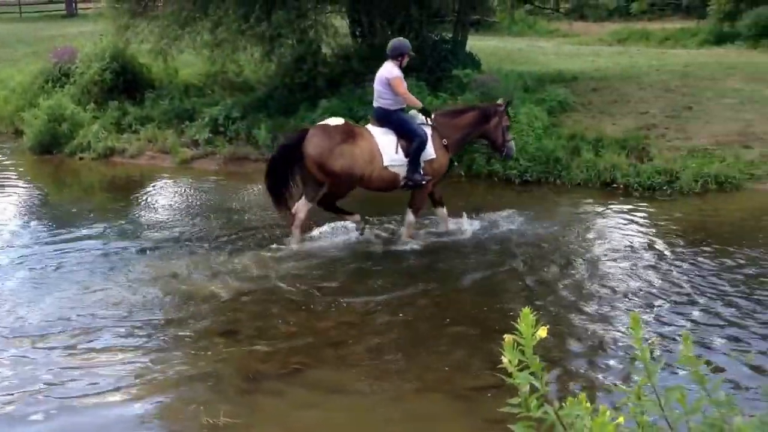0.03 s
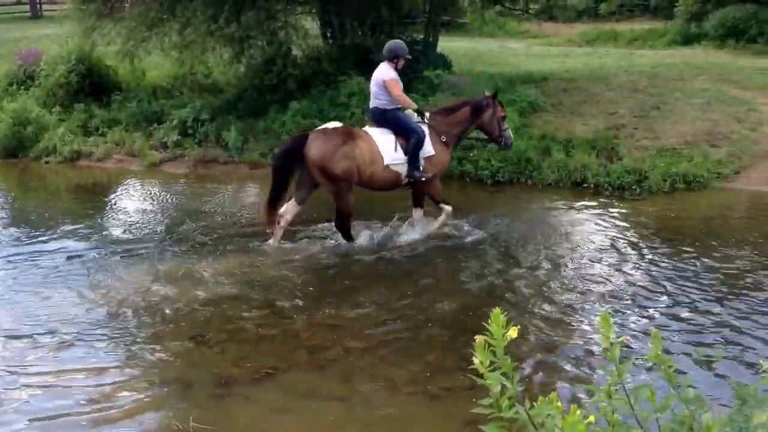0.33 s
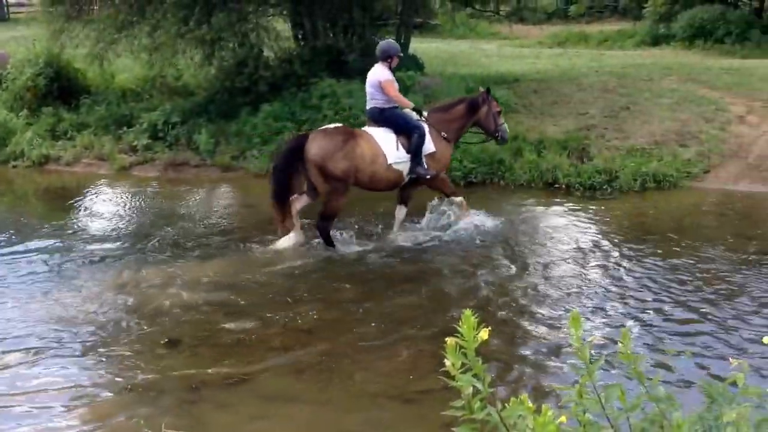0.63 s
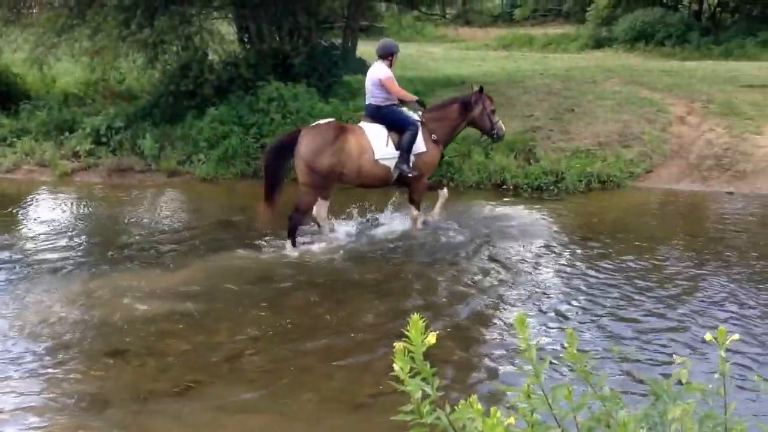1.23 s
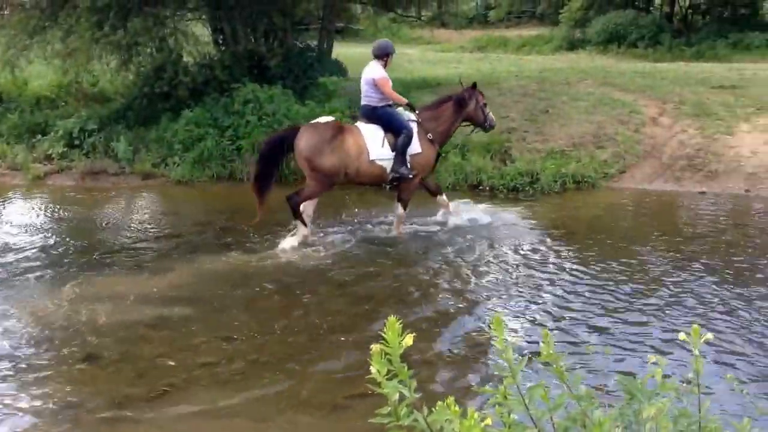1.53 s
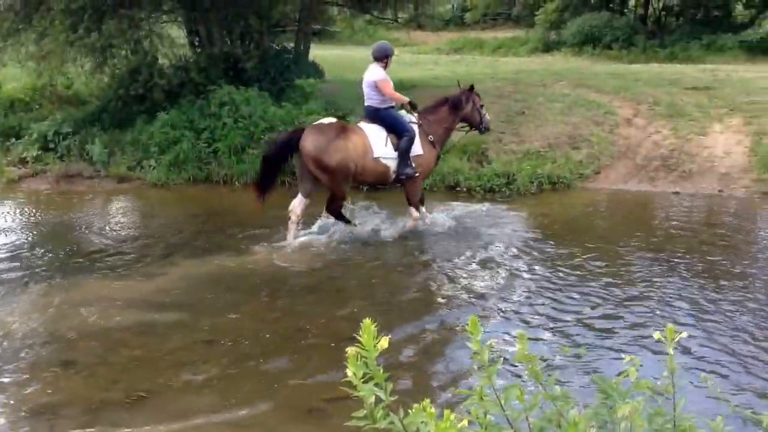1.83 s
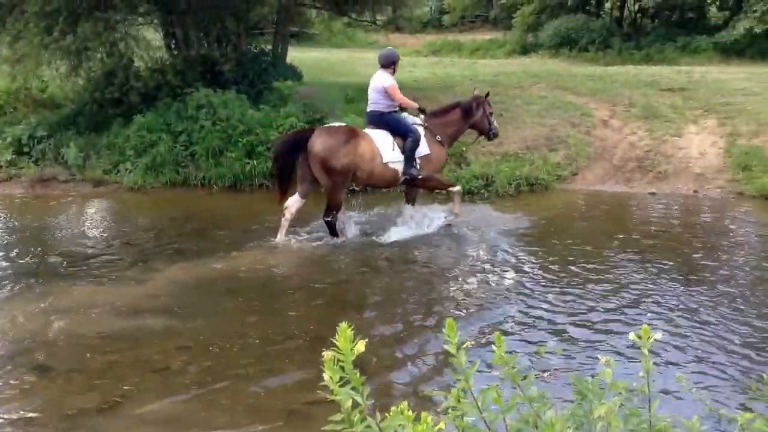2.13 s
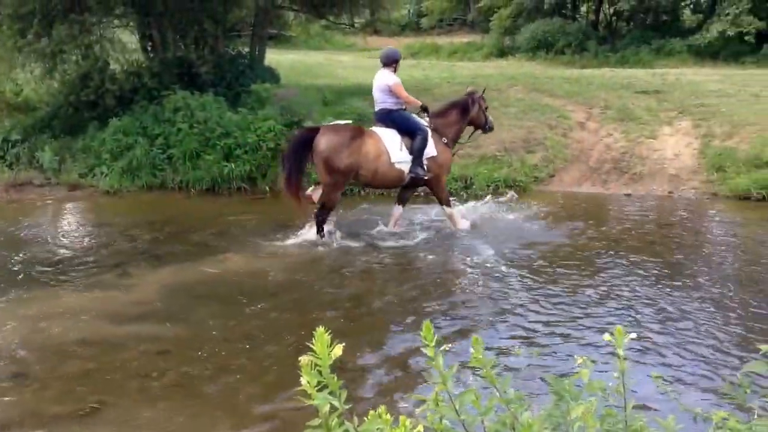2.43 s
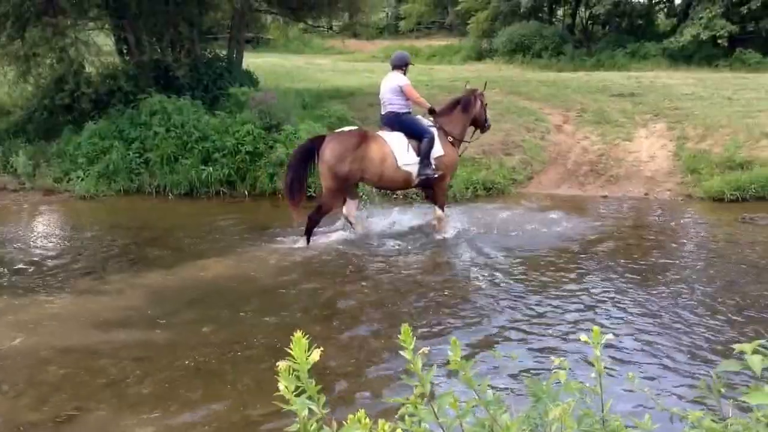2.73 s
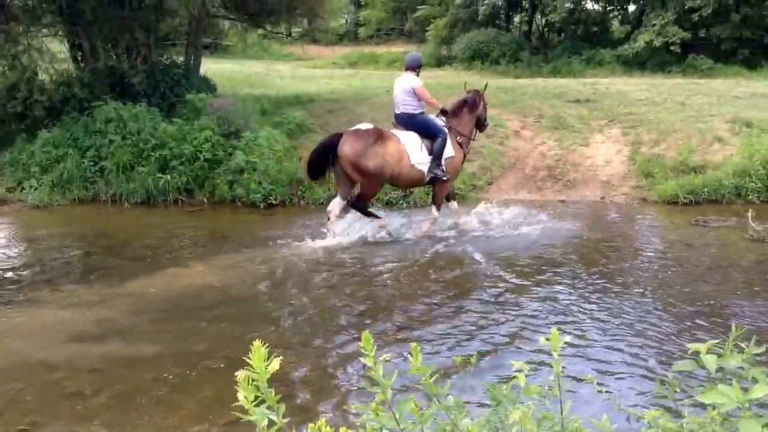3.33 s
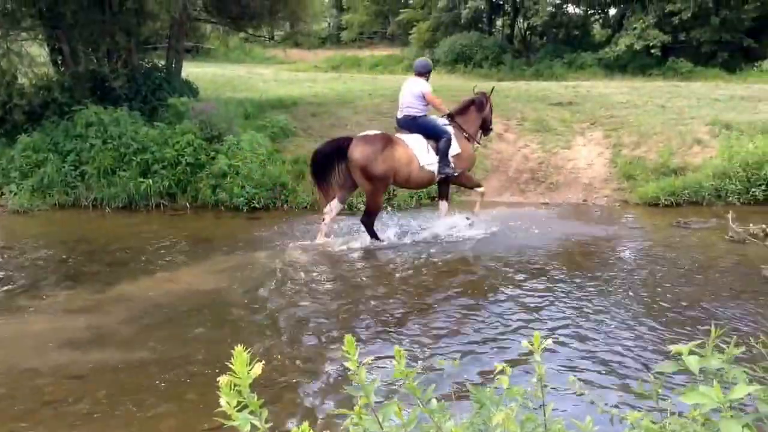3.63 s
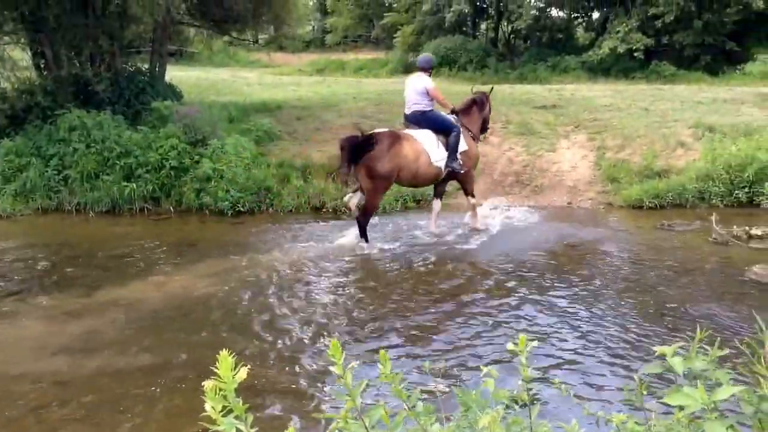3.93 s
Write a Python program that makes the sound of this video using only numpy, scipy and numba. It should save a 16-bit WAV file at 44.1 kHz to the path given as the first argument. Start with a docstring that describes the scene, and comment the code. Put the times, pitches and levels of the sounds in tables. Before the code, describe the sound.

A horse splashes through shallow river water, with insects buzzing faintly.

```python
"""A horse walks through a shallow river some ten metres away, heard in mono.
From the start the river washes, a cricket trills, another insect chirps and a katydid buzzes.
Then each leg slaps the surface, churns up bubbles and opens a pocket of air that shuts with a low plunk.
After it, bubbles ring in the wake and thrown spray patters back. As the strides go on, the katydid
ticks and buzzes again about once a second."""
import sys
import numpy as np
from scipy import signal
from scipy.fft import rfft, irfft
from scipy.io import wavfile
from scipy.ndimage import uniform_filter1d
from numba import njit

SR = 44100
rng = np.random.default_rng(int(sys.argv[2]) if len(sys.argv) > 2 else 0)


def wav_record(signal):
    """Record a signal, one row per channel, as 16-bit PCM in the file named by sys.argv[1]."""
    frames = np.transpose(np.atleast_2d(signal))
    bounded = np.clip(frames, -1, 1)
    # unit amplitude maps onto the largest positive 16-bit level
    quanta = np.round(bounded * 32767).astype(np.int16)
    wavfile.write(sys.argv[1], SR, quanta)


N = 176400


def undb(db):
    return 10 ** (np.asarray(db) / 20)


def unit(x):
    return x / np.sqrt(np.mean(x ** 2))


def colour(x, spectrum):
    """Spectral shaping by (Hz, dB) points, to rms 1."""
    hz, db = np.array(spectrum).T
    f = np.maximum(np.fft.rfftfreq(N, 1 / SR), 1)
    gain = undb(np.interp(np.log(f), np.log(hz), db))
    return unit(irfft(rfft(x) * gain, N))


def band(hz, width_hz):
    """Resonance: noise in a single peak, rms 1."""
    f = np.fft.rfftfreq(N, 1 / SR)
    return unit(irfft(rfft(rng.standard_normal(N)) / (1 + ((f - hz) / width_hz * 2) ** 2), N))


def wander(rate_hz):
    """Random modulation: smoothed steps, rms 1."""
    k = max(int(SR / rate_hz), 1)
    steps = np.repeat(rng.standard_normal(N // k + 1), k)
    return unit(uniform_filter1d(uniform_filter1d(steps, k), k)[:N])


@njit
def ring(starts, hz, cycles, sizes, glide):
    """Damped oscillation: each bubble is a dying sine whose pitch rises."""
    out = np.zeros(N)
    for k in range(len(starts)):
        n, phase = int(cycles[k] / hz[k] * SR), 0.
        for i in range(min(n, N - starts[k])):
            phase += 2 * np.pi * hz[k] * (1 + glide * i / n) / SR
            out[starts[k] + i] += sizes[k] * np.exp(-5 * i / n) * np.sin(phase)
    return out


def bubbles(spectrum, lo_hz, hi_hz, cycles, spread_db, glide, count):
    """Superposition of bubbles of random onset, pitch and size, to rms 1."""
    when, pitch, life, size = rng.random((count, 4)).T
    starts = (when * N).astype(np.int64)
    hz = lo_hz * (min(hi_hz, SR / 2) / lo_hz) ** pitch
    sizes = undb(spread_db * np.minimum(-np.log(1 - size), np.pi)) * hz
    return colour(ring(starts, hz, cycles * (.5 + life), sizes, float(glide)), spectrum)


# The river's wash. Each row: frequency in Hz, relative level in dB.
RIVER_SPECTRUM = [(25, -32), (60, 9), (130, -37.5), (330, -17), (590, -6), (820, 1.5), (1500, -13.5),
                  (3000, -2.5), (6500, -4.5), (8500, 0), (10500, -9.5), (15000, -8)]

def river():
    """Broadband noise of running water, wavering slightly in level."""
    return undb(-48.5 + 0.24 * wander(10.37)) * colour(rng.standard_normal(N), RIVER_SPECTRUM)


# Insect chirps. Each row: centre in seconds, level in dB.
INSECT_CHIRPS = [(.03, -55), (.26, -54.5), (.505, -54), (.725, -54), (.985, -52), (1.24, -51.5),
                 (1.485, -53), (1.705, -52.5), (1.95, -55), (2.255, -55), (2.52, -57), (3.36, -57),
                 (3.7, -56)]

def far_insects(t, half_chirp_s=0.039):
    """Narrow-band resonance: pulsed for an insect's chirps, steady for a cricket's trill."""
    pulses = sum(undb(db) * np.exp(-((t - at) / half_chirp_s) ** 4) for at, db in INSECT_CHIRPS)
    chirps = pulses * band(9000, width_hz=420)
    trill = undb(-61) * band(7300, width_hz=430)
    return chirps + trill


# Single wing strokes. Each row: centre in seconds, level in dB.
WING_TICKS = [(0.88, -43), (.941, -42), (1.010, -43), (1.982, -43.5), (2.043, -43), (2.940, -46),
              (2.994, -44), (3.053, -40.5), (3.115, -42)]
# Runs of strokes. Each row: start and end in seconds, level in dB before modulation.
WING_BUZZES = [(-.006, 0.454, -44), (1.043, 1.545, -45.5), (2.09, 2.626, -43.5), (3.195, 3.717, -41.5)]
# The wing's resonance. Each row: frequency in Hz, relative level in dB.
WING_SPECTRUM = [(9500, -20), (11100, -14), (11700, -0.5), (12300, -3), (13100, -4), (13900, -2),
                 (15200, -17)]

def katydid(t, stroke_hz=59.2, tick_s=0.0058, swell_s=0.14, stop_s=0.022):
    """Stridulation: a few single wing strokes, then a swelling run of them."""
    strokes = sum(undb(db) * np.exp(-((t - at) / tick_s) ** 2) for at, db in WING_TICKS)
    for start, end, db in WING_BUZZES:
        swell = np.sqrt(np.clip((t - start) / swell_s, 0, 1)) * np.clip((end - t) / stop_s, 0, 1)
        pulses = 0.073 + 0.74 * np.cos(np.pi * stroke_hz * (t - start)) ** 2
        strokes += undb(db) * swell * pulses
    return strokes * colour(rng.standard_normal(N), WING_SPECTRUM)


def banks(x, t, t60_s=0.26, level_db=-15.5):
    """Reverberation: the leafy banks scatter back a faint tail."""
    scatter = colour(rng.standard_normal(N), [(150, -5.0), (1500, -8.5), (10000, -0.5)])
    tail = scatter * undb(-60 * t / t60_s) * (t > .008)
    return undb(level_db) * signal.fftconvolve(x, tail / np.sqrt(np.sum(tail ** 2)))[:N]


# Gurgling in the wake. Each row: frequency in Hz, relative level in dB.
GURGLE_SPECTRUM = [(130, -8), (220, -10.5), (340, -3.5), (460, -7), (600, -4.5)]

def gurgles():
    """Bubble resonance: lone bubbles ring low as they surface."""
    return undb(-59) * bubbles(GURGLE_SPECTRUM, 153, 513, cycles=14, spread_db=1, glide=0.058, count=600)


# Legs sweeping through water. Each row: peak, rise and fall in seconds; churn, froth and spray in dB.
LEG_SWEEPS = [(.205, 0.0075, 0.036, -39.5, -41.5, -57), (0.284, 0.019, 0.015, -41, -44, -56),
              (0.346, 0.017, 0.023, -36.5, -34, -63), (0.719, 0.17, 0.028, -48, -52, -59),
              (1.067, 0.062, 0.074, -39.5, -35.5, -44), (1.541, 0.014, 0.11, -42, -45.5, -58),
              (1.914, 0.035, 0.11, -40.5, -38, -50), (2.355, 0.073, 0.062, -52.5, -52, -47.5),
              (2.735, 0.035, 0.049, -39, -37.5, -48), (2.805, 0.023, 0.15, -49.5, -45.5, -59),
              (3.155, 0.042, 0.073, -46.5, -42, -45), (3.47, 0.036, 0.064, -35, -39, -54),
              (3.851, 0.011, 0.083, -46, -42.5, -59)]
# Spray raining back. Each row: time in seconds, level in dB.
FALLING_SPRAY = [(0, -45.5), (.085, -46.5), (.135, -42), (.245, -46.5), (.33, -43.5), (.46, -52),
                 (.6, -44.3), (.76, -43.5), (.92, -46), (1.2, -42.2), (1.46, -48), (1.56, -44.8),
                 (2.1, -44.7), (2.52, -43.2), (2.9, -42), (3.06, -45), (3.53, -42.3), (3.6, -44.3),
                 (3.66, -40.7), (3.75, -41), (3.92, -45.3)]
# Deep churn, small bubbles, fine drops and big drops. Each row: frequency in Hz, relative level in dB.
CHURN_SPECTRUM = [(50, -41), (90, -57), (130, -10.5), (220, 0.5), (330, 2), (460, 3), (580, -18),
                  (900, -83)]
FROTH_SPECTRUM = [(400, -2), (600, -8.5), (760, 0.5), (1200, -3.5), (1700, -12.5), (2500, -13.5),
                  (5000, -30)]
SPRAY_SPECTRUM = [(600, -11), (1000, -3.5), (2000, -1), (2500, -3.5), (3000, -1.5), (5000, -4), (8000, -8),
                  (10500, -11), (15000, -12)]
PLINK_SPECTRUM = [(1200, -2), (5000, -12.5)]

def wading(t, ripple_db=-50.5, plink_db=-11):
    """Incoherent sources add in power: strides stir bubbles and spray over ripples and falling drops."""
    power = np.zeros((3, N))
    for at, rise, fall, *db in LEG_SWEEPS:
        sweep = np.exp(np.minimum((t - at) / rise, (at - t) / fall))
        power += (undb(db)[:, None] * sweep) ** 2
    churn_power, froth_power, spray_power = power
    falling = undb(np.interp(t, *np.array(FALLING_SPRAY).T))
    churn = bubbles(CHURN_SPECTRUM, 113, 745, cycles=11.3, spread_db=1, glide=0.06, count=3000)
    froth = bubbles(FROTH_SPECTRUM, 554, 4090, cycles=29.6, spread_db=5, glide=0.13, count=6000)
    drops = bubbles(SPRAY_SPECTRUM, 900, 16000, cycles=14, spread_db=4.2, glide=.06, count=48000)
    drops *= undb(.5 * wander(110))
    plinks = bubbles(PLINK_SPECTRUM, 1100, 4500, cycles=50, spread_db=3, glide=.1, count=300)
    return (churn * np.sqrt(churn_power)
            + froth * np.sqrt(froth_power + undb(ripple_db) ** 2)
            + drops * np.sqrt(spray_power + falling ** 2)
            + plinks * undb(plink_db) * falling)


# Sheets of water landing. Each row: start in seconds, smack and hiss in dB, decay in seconds, pitch in Hz.
SURFACE_SLAPS = [(.136, -41, -29.5, 0.0053, 3200), (.169, -31.5, -32, 0.0087, 1160),
                 (0.198, -22, -33.5, 0.0045, 1070), (0.291, -33, -41, 0.013, 1140),
                 (0.427, -46, -32.5, 0.0052, 1410), (.683, -33, -30.5, 0.0085, 1530),
                 (0.718, -38.5, -38, 0.022, 1540), (1.111, -35, -45, .006, 8000),
                 (1.139, -38.5, -45, 0.025, 1100), (1.252, -33.5, -47, 0.005, 1026),
                 (1.495, -36, -44, 0.02, 1210), (1.619, -35, -31.5, 0.0044, 3000),
                 (1.649, -34.5, -43, 0.0091, 1330), (1.826, -37.5, -47, 0.016, 2280),
                 (1.877, -34.5, -38, 0.02, 690), (2.345, -32.5, -31, 0.0056, 1090),
                 (2.538, -36, -32, 0.0065, 5000), (3.132, -37.5, -34, 0.01, 850),
                 (3.259, -36, -50, 0.0085, 2760), (3.369, -42, -47, 0.018, 2900),
                 (3.411, -38, -36.5, 0.015, 875), (3.439, -36, -49, 0.0061, 5000),
                 (3.849, -34, -33.5, 0.0045, 5000)]

def slaps(t, rise_s=0.0011):
    """Impact noise: water hits the surface with a short smack and a hiss of fine drops."""
    out = np.zeros(N)
    hiss = colour(rng.standard_normal(N), SPRAY_SPECTRUM)
    for at, smack_db, hiss_db, decay, hz in SURFACE_SLAPS:
        age = np.maximum(t - at, 0)
        envelope = (1 - np.exp(-age / rise_s)) * np.exp(-age / decay)
        out += envelope * (undb(smack_db) * band(hz, hz) + undb(hiss_db) * hiss)
    return out


def air_pockets(t, rows, rise_s, decay_cycles, glide_per_s):
    """Minnaert resonance: trapped air swings like a spring and dies away, rising in pitch."""
    out = np.zeros(N)
    for at, db, hz in rows:
        age = np.clip(t - at, 0, .5)
        envelope = (1 - np.exp(-(age / rise_s) ** 2)) * np.exp(-age * hz / decay_cycles)
        phase = 2 * np.pi * hz * age * (1 + glide_per_s * age / 2)
        out -= undb(db) * envelope * np.sin(phase)
    return out


# Large bubbles in the wake. Each row: start in seconds, level in dB, starting pitch in Hz.
WAKE_BUBBLES = [(0.227, -35, 260), (.264, -37, 296), (.298, -40, 403), (0.471, -36, 333), (1.375, -28, 793),
                (1.562, -26.5, 735), (1.594, -37, 315), (1.682, -35, 480), (2.767, -29.5, 298),
                (2.802, -26, 1310), (3.095, -39, 440), (3.218, -31.5, 376)]

def bloops(t):
    """Light damping: large free bubbles ring on with a clear pitch."""
    return air_pockets(t, WAKE_BUBBLES, rise_s=0.0034, decay_cycles=5.3, glide_per_s=3)


# Air pockets closing. Each row: start in seconds, relative level in dB, starting pitch in Hz.
HOOF_POCKETS = [(0.1958, -25, 230), (0.2023, -21, 395), (.340, -28, 210), (0.713, -28.5, 320),
                (1.0283, -23, 396), (1.030, -24.5, 214), (1.089, -23, 276), (1.856, -32.5, 230),
                (1.9059, -17, 324), (1.940, -26.5, 245), (2.344, -32.5, 315), (2.381, -30, 320),
                (2.689, -34.5, 338), (2.7452, -19.5, 274), (2.749, -28, 268), (3.071, -34, 420),
                (3.134, -29, 396), (3.1545, -19, 754), (3.158, -32, 274), (3.420, -30, 240),
                (3.467, -26.5, 384), (3.526, -26.5, 675)]

def plunks(t):
    """Heavy damping: the pocket behind a hoof shuts within a few cycles."""
    return undb(5) * air_pockets(t, HOOF_POCKETS, rise_s=0.0016, decay_cycles=1.71, glide_per_s=9.6)


def scene():
    """Superposition: the horse and its reverberation add to the river and the insects."""
    t = np.arange(N) / SR
    horse = wading(t) + gurgles() + slaps(t) + bloops(t) + plunks(t)
    mono = horse + banks(horse, t) + river() + katydid(t) + far_insects(t)
    return np.array([mono, mono])


def record(dry, low_hz=112, top_hz=15250):
    """Band limiting: a small microphone drops the bass and cuts the top."""
    thin = signal.sosfilt(signal.butter(6, low_hz, "high", fs=SR, output="sos"), dry)
    return signal.sosfilt(signal.ellip(14, .2, 80, top_hz, fs=SR, output="sos"), thin)


dry = scene()
out = record(dry)
wav_record(out)
```